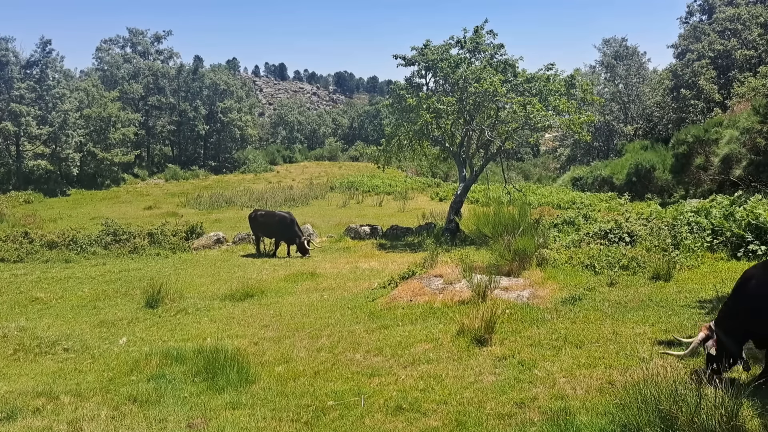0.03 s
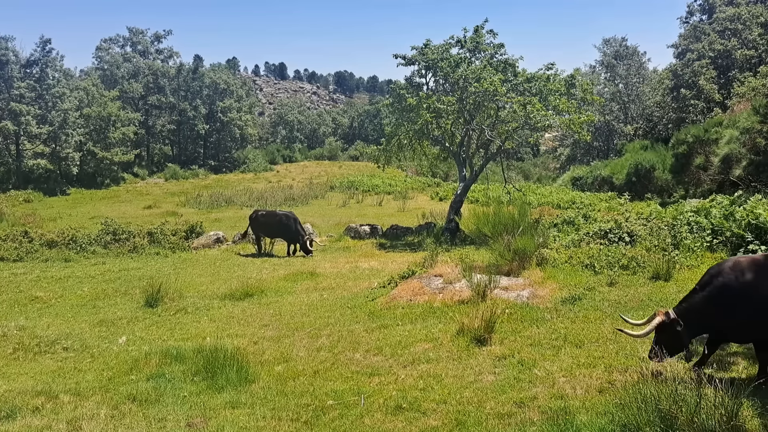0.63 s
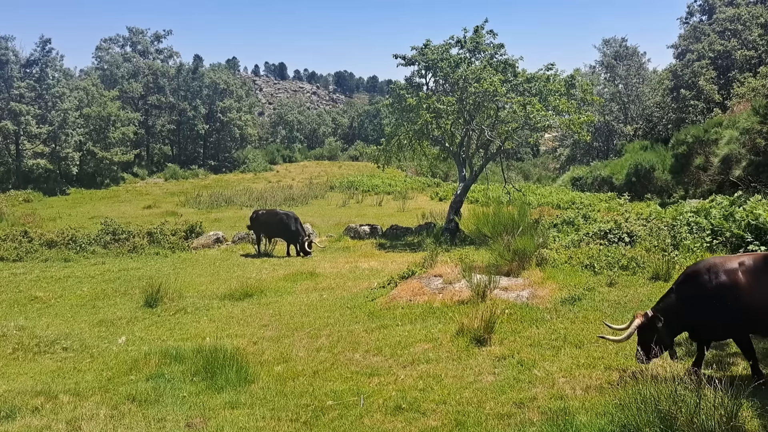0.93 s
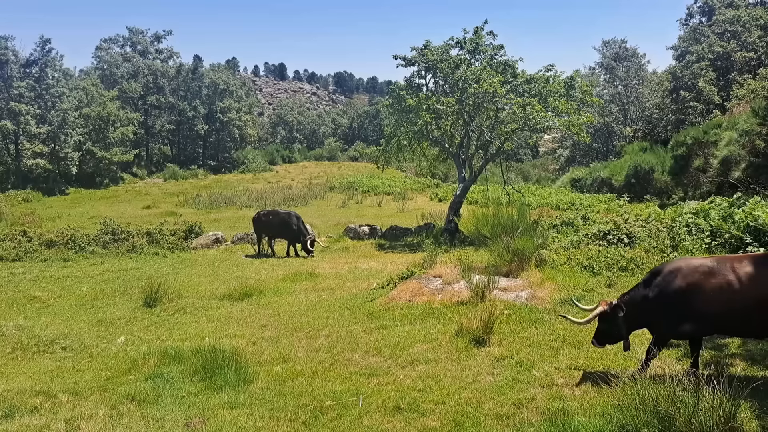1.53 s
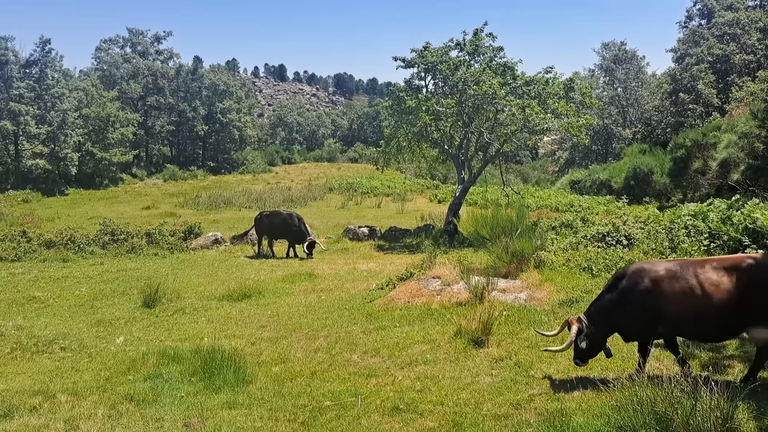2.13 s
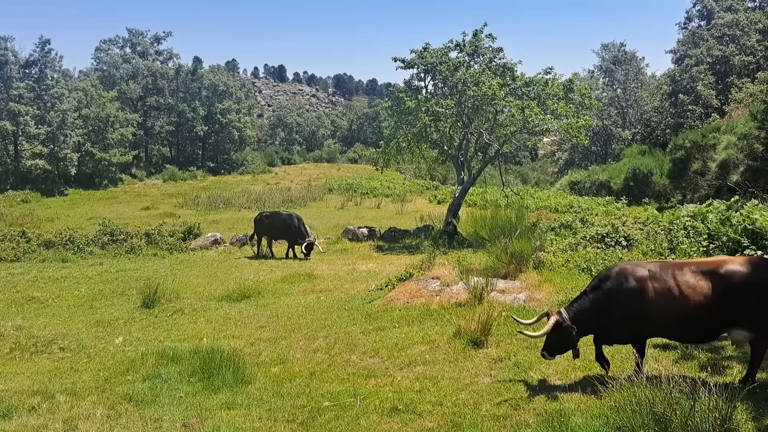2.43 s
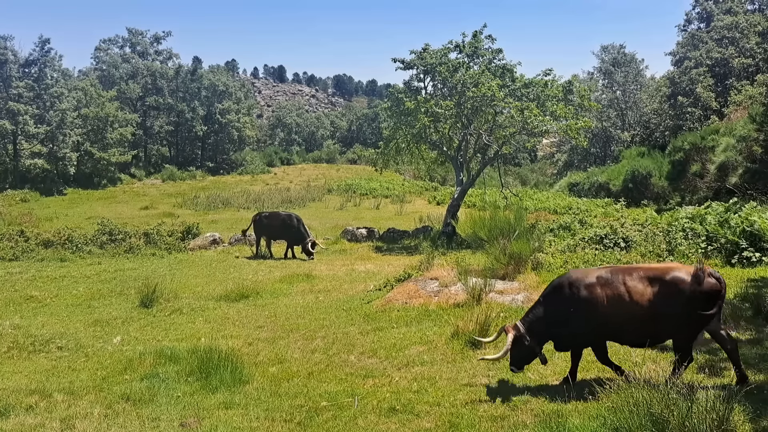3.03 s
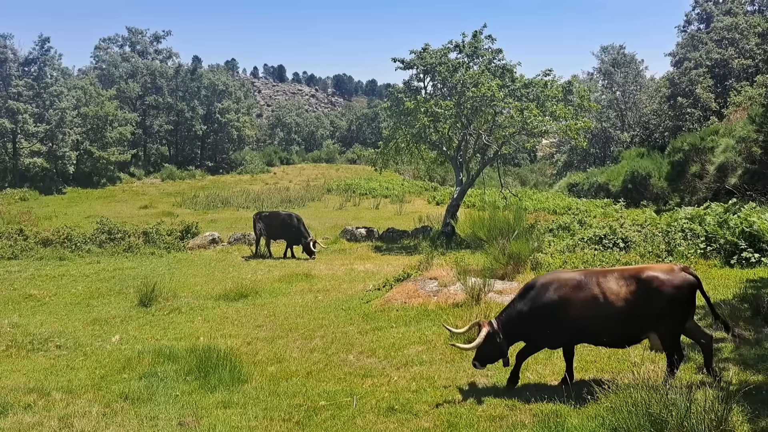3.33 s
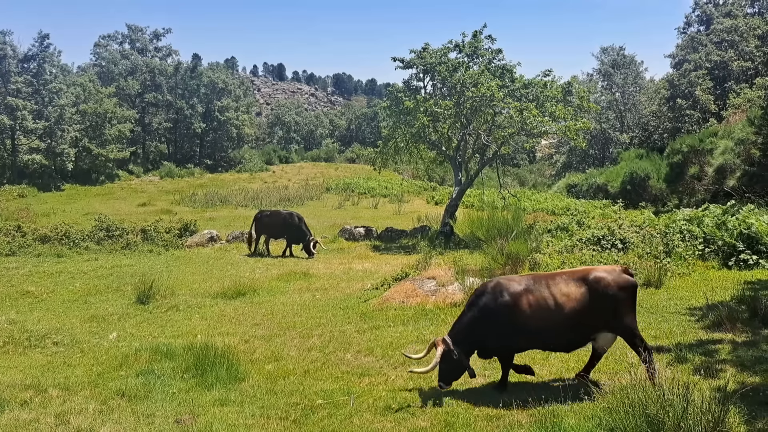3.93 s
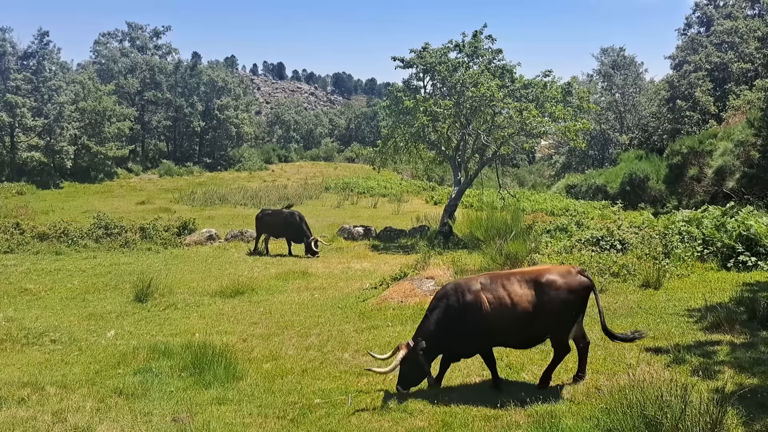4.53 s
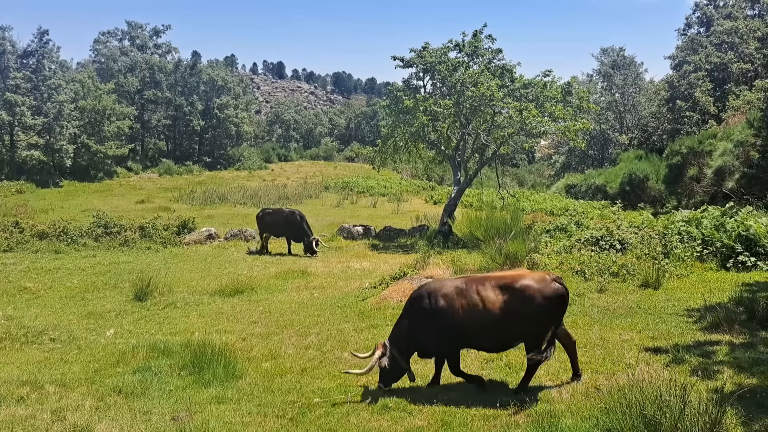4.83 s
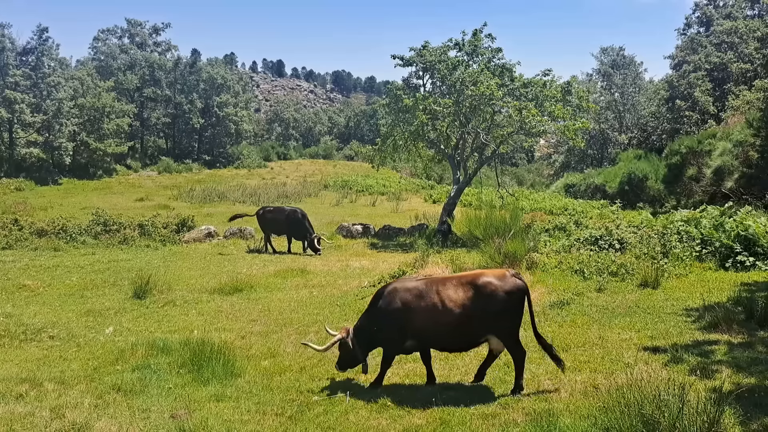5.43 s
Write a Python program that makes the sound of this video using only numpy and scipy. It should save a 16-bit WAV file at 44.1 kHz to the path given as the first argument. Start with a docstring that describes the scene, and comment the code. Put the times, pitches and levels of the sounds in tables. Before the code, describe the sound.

Bright, tinny clanks from a nearby cowbell come in irregular bursts, slightly right of the microphone, thinning out midway and growing busier near the end. A second, lower cowbell tonks now and then from further away. Each stroke rings briefly with a slight outdoor echo. The pasture is otherwise quiet, with a faint hiss, soft brushing of grass, a few hoof thuds and snapping twigs, and later some very faint high chirps.

```python
"""A riveted sheet-metal cowbell clanks brightly close by, to the right; a deeper one tonks further off.
Two cows graze in a quiet mountain pasture. Each clapper blow excites the damped modes of a bell's wall,
which ring until the clapper lands again. Hooves and muzzles stir the grass and twigs snap in bursts of
noise, small birds chirp over a faint hiss, and rocks and trees scatter a thin echo."""
import sys
import numpy as np
from scipy import signal
from scipy.fft import rfft, irfft, next_fast_len
from scipy.io import wavfile
from scipy.ndimage import uniform_filter1d

SR = 44100
rng = np.random.default_rng(int(sys.argv[2]) if len(sys.argv) > 2 else 0)


def pcm_store(signal):
    """Save signal as 16-bit PCM."""
    levels = np.round(np.clip(np.atleast_2d(signal), -1, 1) * 32767)
    wavfile.write(sys.argv[1], SR, levels.astype(np.int16).T)


N = 250929


def amp(db):
    """The decibel scale: 20 dB is a factor of ten in amplitude."""
    return 10 ** (np.asarray(db) / 20)


def unit(x):
    """Normalisation to an rms of 1."""
    return x / np.sqrt(np.mean(x ** 2) + 1e-20)


def read(points, hz):
    """Interpolation on a log-frequency axis."""
    f, value = np.transpose(points)
    return np.interp(np.log(hz + 1), np.log(f + 1), value)


def add(mix, s, sound):
    """Superposition: a sound joins the mix at time s."""
    part = mix[:, max(round(s * SR), 0):][:, :sound.shape[-1]]
    part += sound[..., :part.shape[1]]


def wander(size, span):
    """Low-pass fluctuation: noise averaged over span samples, with rms 1."""
    return unit(uniform_filter1d(rng.standard_normal(size), span))


def noise(colour_db, correlation, size):
    """Partial coherence: stereo noise of rms 1, its spectrum and correlation functions of frequency."""
    hz = np.fft.rfftfreq(size, 1 / SR)
    left, independent = rfft(rng.standard_normal((2, size)))
    shared = np.clip(correlation(hz), -1, 1)
    right = shared * left + np.sqrt(1 - shared ** 2) * independent
    return unit(irfft(np.array([left, right]) * amp(colour_db(hz)), size))


# Spectrum of the background hiss: (frequency [Hz], relative level [dB])
BACKGROUND_SPECTRUM = [(20, -33), (35, -3), (50, 7.5), (80, -4.5), (160, -5), (260, -2), (480, -10),
                       (1000, -6.5), (1600, -17.5), (3300, -18), (4500, -13.5), (6300, -13.5),
                       (9000, -21.5), (16000, -19)]
# Its slow rise and fall: (time [s], relative level [dB])
BACKGROUND_SWELL = [(0.0, -90), (0.86, -93.5), (1.08, -88), (1.35, -90), (1.52, -89.5), (1.74, -92.5),
                    (1.92, -88), (2.8, -92.5), (3.26, -86), (3.53, -90), (3.88, -91.5), (4.15, -87),
                    (4.74, -89.5), (4.94, -88), (5.59, -90.5), (5.69, -85.5)]
# Its coherence: (frequency [Hz], left-right correlation [1])
BACKGROUND_COHERENCE = [(40, 0.61), (250, 0.81), (1000, 0.32), (4000, 0.034), (15000, 0.071)]

def background(level_db=-67.5):
    """Amplitude modulation: the faint background hiss slowly rises and falls."""
    s, db = np.transpose(BACKGROUND_SWELL)
    swell = amp(np.interp(np.arange(N) / SR, s, db - np.median(db)))
    hiss = noise(lambda hz: read(BACKGROUND_SPECTRUM, hz), lambda hz: read(BACKGROUND_COHERENCE, hz),
                 size=next_fast_len(N))[:, :N]
    return amp(level_db) * hiss * swell * amp([[-1.4], [.6]])


# Decay of the echo: (frequency [Hz], reverberation time T60 [s])
ECHO_DECAY = [(300, 0.53), (800, 0.43), (2500, 0.18), (6000, 0.26), (15000, 0.08)]

def pasture_echo(sound, build_s=0.015, reflections_per_s=2500):
    """Scattering: ground, rocks and trees return sparse reflections that build up and die away."""
    taps = rng.standard_normal((2, SR)) * (rng.random((2, SR)) < reflections_per_s / SR)
    hz, t, spectrum = signal.stft(taps, SR, nperseg=256)
    decay = amp(-60 * t / read(ECHO_DECAY, hz)[:, None])
    tail = signal.istft(spectrum * decay * (1 - np.exp(-t / build_s)), SR, nperseg=256)[1]
    return signal.fftconvolve(sound, unit(tail) / np.sqrt(tail.shape[1]), axes=1)[:, :N]


# Bird calls: (time [s], duration [s], start frequency [Hz], end frequency [Hz], level [dB])
BIRD_CALLS = [(3.397, 0.078, 5180, 6280, -75.5), (3.557, 0.046, 5500, 6000, -88),
              (3.743, 0.019, 5240, 6020, -74), (3.8, 0.042, 5500, 6200, -73.5),
              (3.908, 0.045, 6950, 6900, -97), (5.135, 0.079, 6500, 6650, -77.5)]

def birds(warble_hz=280):
    """Frequency modulation: thin tones, most of them rising, waver in pitch."""
    out = np.zeros((2, N))
    for s, length, start_hz, end_hz, db in BIRD_CALLS:
        warble = wander(SR // 4, 60)[:int(length * SR)]
        hz = np.linspace(start_hz, end_hz, len(warble)) + warble_hz * warble
        tone = np.sin(2 * np.pi * np.cumsum(hz) / SR)
        add(out, s, amp(db) * unit(tone * np.hanning(len(hz))))
    return out


def puff(length, centre_hz, octaves, db, grain_db=3):
    """A noise transient: a grainy band of noise swells quickly and fades."""
    band_db = lambda hz: -40 * np.log10(1 + (np.log2((hz + 1) / centre_hz) / octaves) ** 2)
    hiss = noise(band_db, lambda hz: .7, size=16384)
    grain = amp(grain_db * wander(hiss.shape[1], 150))
    progress = np.linspace(0, 1, min(int(length * SR), len(grain)))
    envelope = np.sin(np.pi * progress ** 0.5)
    return amp(db) * unit((hiss * grain)[:, :len(progress)] * envelope)


# Hooves set down on turf: (time [s], level [dB])
HOOF_FALLS = [(1.68, -71), (1.945, -66.5), (2.084, -60.5), (4.032, -60.5)]
# Legs and muzzles brush the grass: (time [s], duration [s], centre frequency [Hz], level [dB])
GRASS_BRUSHES = [(.002, 0.13, 5000, -77.5), (.304, 0.067, 760, -69), (.998, 0.36, 533, -67),
                 (1.05, .11, 6400, -78), (1.705, 0.077, 215, -66.5), (2.752, 0.28, 233, -74.5),
                 (3.172, 0.31, 221, -69), (3.691, 0.026, 252, -66), (4.599, 0.2, 200, -65.5),
                 (5.456, .25, 275, -71)]
# Dry stalks and twigs break: (time [s], duration [s], centre frequency [Hz], level [dB])
TWIG_SNAPS = [(1.336, 0.043, 2300, -57.5), (1.701, 0.18, 2300, -75.5), (1.9845, 0.0043, 6650, -47),
              (2.024, 0.015, 6550, -75.5), (4.002, 0.026, 4050, -71)]

def grazing(side_db=-2):
    """Impact, friction and fracture: hooves thud, grass rustles and twigs snap as bands of noise."""
    out = np.zeros((2, N))
    for s, db in HOOF_FALLS:
        add(out, s, puff(length=0.078, centre_hz=38, octaves=2.38, db=db))
    for rows, octaves in (GRASS_BRUSHES, 0.78), (TWIG_SNAPS, 0.43):
        for s, length, centre_hz, db in rows:
            add(out, s, puff(length, centre_hz, octaves, db))
    return out * amp([[side_db / 2], [-side_db / 2]])


def free_times(blows):
    """Free vibration lasts from one blow to the next: these intervals in seconds."""
    return np.diff([row[0] for row in blows], append=N / SR + 1)


def ring(hz, db, t60, side_db, lead, free_s, rise_s, catch_s, flutter_db=1.58):
    """Damped vibration: modes decay exponentially, and faster once the clapper lands again."""
    t = np.arange(int(min(free_s + 5 * np.max(catch_s), .7) * SR)) / SR
    reference_s = .014  # the free decay passes through unit gain here
    caught = np.maximum(t - free_s, 0) / np.reshape(catch_s, (-1, 1))
    modes = np.exp(np.outer(2j * np.pi * hz - np.log(1000) / t60, t - reference_s) - caught)
    stereo = np.array([amp(side_db / 2) * np.exp(1j * lead), amp(-side_db / 2)])
    start_phase = np.exp(2j * np.pi * rng.random(len(hz)))
    stereo *= 2 / np.linalg.norm(stereo, axis=0) * amp(db) * start_phase
    flutter = amp(flutter_db * wander(SR, 400)[:len(t)])  # a quick, slight flutter in loudness
    return (stereo @ modes).real * flutter * (1 - np.exp(-t / rise_s))


def contact(clang_db, bright_db, shimmer_db, modes, rise_s=0.00037, side_db=-5):
    """Forced vibration: the clapper cracks on the wall, then its short rasp keeps shaking the modes."""
    crack_db, crack_s, rasp_db, rasp_s = -2, 0.004, -9, .032
    half_width_hz, valley = 65, .05
    colour = [(300, clang_db - 19), (1700, clang_db - 30.5), (3000, clang_db - 11),
              (4000, clang_db - 11), (5300, clang_db - 6.5), (7500, bright_db - 6.5),
              (9000, shimmer_db - 41), (12000, shimmer_db - 9.5), (15000, shimmer_db - 19.5)]
    peak = lambda offset_hz: rng.exponential() / (1 + (offset_hz / half_width_hz) ** 2) ** 2
    wall_db = lambda hz: 10 * np.log10(valley + sum(peak(hz - mode[0]) for mode in modes))
    crack = noise(lambda hz: read(colour, hz), lambda hz: .2, size=8192)
    rasp = noise(lambda hz: read(colour, hz) + wall_db(hz), lambda hz: .2, size=8192)
    t = np.arange(crack.shape[1]) / SR
    grit = amp(crack_db) * crack * np.exp(-t / crack_s) + amp(rasp_db) * rasp * np.exp(-t / rasp_s)
    strength = np.linalg.norm(amp([clang_db, bright_db, shimmer_db]))
    return strength * grit * (1 - np.exp(-t / rise_s)) * amp([[side_db / 2], [-side_db / 2]])


# Clapper blows on the deep bell: (time [s], force [dB], hardness as a cutoff frequency [Hz])
DEEP_BELL_BLOWS = [(.945, -60, 3500), (1.203, -32, 4970), (1.256, -51, 8000), (1.8, -47.5, 2640),
                   (2.032, -45, 2250), (2.335, -64.5, 1610), (3.234, -37, 2470), (3.487, -69.5, 2010),
                   (3.79, -51, 750), (3.845, -61, 833), (4.061, -49.5, 2500), (4.228, -36, 905),
                   (4.293, -54.5, 1610), (4.363, -51.5, 950), (4.412, -89, 3000), (5.005, -53.5, 1210),
                   (5.144, -52.5, 850), (5.185, -51.5, 850), (5.255, -84, 2500), (5.628, -58, 3000)]
# Its modes: (frequency [Hz], level within the family [dB], T60 [s], left minus right [dB])
DEEP_BELL_MODES = [(745, 0, .3, -1), (1843, 0, .7, 2), (3407, -6, .27, -9), (3445, -9, .25, -8),
                   (4334, -1, .18, -6), (4984, -7, .22, -7), (5184, -6, .16, -6), (5501, -2, .26, -4),
                   (7607, -8, .15, -3)]
# Response of its families to a fully hard blow: (hum [dB], second mode [dB], overtones [dB])
DEEP_RESPONSE = (-1, -21, -10.5)

def deep_bell(lag_s=.00009, crack_db=(-6, -6, -4), soft_slope=6.8):
    """A soft impact is a low-pass filter: the larger bell mostly hums, and cracks only on hard blows."""
    out = np.zeros((2, N))
    hz, mode_db, t60, side_db = np.transpose(DEEP_BELL_MODES)
    family = np.minimum(np.arange(len(hz)), 2)
    lead = -2 * np.pi * hz * lag_s  # the sound reaches the left side later
    catch_s = 0.0033 * (hz / hz[0]) ** 3.2  # the landing clapper stops the hum first
    for (s, force_db, hardness_hz), free_s in zip(DEEP_BELL_BLOWS, free_times(DEEP_BELL_BLOWS)):
        dull_db = 10 * np.log10(1 + (hz / hardness_hz) ** soft_slope)
        drive_db = force_db + np.array(DEEP_RESPONSE)[family] - (dull_db - dull_db[0])
        add(out, s, ring(hz, mode_db + drive_db, t60, side_db, lead, free_s, rise_s=0.01, catch_s=catch_s))
        contact_db = np.median(drive_db[family == 2]) + np.array(crack_db)
        add(out, s, contact(*contact_db, DEEP_BELL_MODES))
    return out


# Weak modes of the near bell's seams: (lowest frequency [Hz], highest frequency [Hz],
#   relative level [dB], base T60 [s], left minus right [dB])
SEAM_BAND = (4319, 14168, -30, 0.34, 1)

def seam_modes(count):
    """Irregular modal spacing: folded seams add resonances spread unevenly over the treble."""
    low_hz, high_hz, *shared = SEAM_BAND
    position = (np.arange(count) + rng.random(count)) / count
    return [(hz, *shared) for hz in low_hz + (high_hz - low_hz) * position]


# Waves round the rim: (low pair [count], high pair [count])
RIM_ORDERS = (3, 4)

def pair_shares(rim_degrees, node_leak_db=-29):
    """Mode doublets: a blow on one mode's node drives its twin most; gives the four levels in dB."""
    angle = np.radians(rim_degrees) * np.array(RIM_ORDERS)
    swing = np.column_stack([np.cos(angle), np.sin(angle)]).ravel()
    return 10 * np.log10(swing ** 2 + amp(node_leak_db) ** 2)


# Clapper blows on the near bell: (time [s], force [dB], height [about -1 shoulder to 1 lip],
#   softness [about -1 sharp to 1 soft], place round the rim [degrees], hum frequency [Hz])
NEAR_BELL_BLOWS = [(.242, -58, -1, -0.35, 56, 1047), (.299, -64.5, -0.28, -0.45, 53, 970),
                   (.434, -55, -0.6, -0.98, 3.3, 1060), (.485, -61.5, -0.22, -1.1, 51, 957),
                   (0.512, -67, -0.31, -0.79, 5.4, 1023), (0.632, -80.5, -1.1, -0.8, 48, 1040),
                   (.822, -44.5, -0.24, -0.22, 1, 1008), (.841, -50.5, -0.52, -0.12, 123, 995),
                   (.869, -54.5, -0.011, 1.45, 81, 1033), (.888, -45, -0.16, -0.015, 35, 1028),
                   (.911, -47.5, -0.052, -0.59, 23, 970), (.95, -55.5, -0.19, 1.33, 87, 1020),
                   (.97, -54, -.5, -0.65, 39, 968), (1.001, -61, -2.15, -0.31, 27, 1034),
                   (1.158, -53, -1.3, -0.17, 43, 1029), (1.405, -60, 0.3, -2.6, 66, 1080),
                   (1.441, -59, -1.04, -1.9, 4.8, 1125), (1.617, -68, -0.65, 0.19, 3.5, 1024),
                   (1.676, -76, 0.097, -0.055, 57, 980), (1.785, -76, -0.48, 0.035, 48, 1020),
                   (1.832, -52, -0.3, -0.17, 1, 1042), (1.905, -52, 0.072, -0.44, 6.9, 1043),
                   (2.07, -55, -0.33, 0.031, 70, 1030), (2.246, -53.5, -0.22, -0.12, 1, 1034),
                   (2.264, -54, 0.33, 0.45, 1.2, 1056), (2.467, -60, -0.22, 1.1, 50, 1040),
                   (2.515, -67, 0.3, 0.44, 5.1, 1067), (2.799, -56.5, 0.27, 0.41, 1.9, 1031),
                   (2.84, -60.5, -0.11, 0.037, 33.5, 1069), (3.102, -56, 0.23, 0.0068, 3.1, 1030),
                   (3.238, -54, -0.12, -0.15, 51, 1023), (3.281, -57.5, -0.42, 0.26, 66, 1040),
                   (3.299, -59.5, -0.41, -1.5, 52, 1046), (3.605, -71.5, -0.14, -.7, 76, 1007),
                   (3.633, -78.5, .3, 0.94, 56, 1014), (4.072, -55.5, 0.043, -0.23, 61, 1023),
                   (4.164, -58, 0.34, 0.21, 57, 1035), (4.254, -45.5, 0.69, -.7, 64, 1065),
                   (4.268, -46, 0.33, 0.31, 59, 1003), (4.301, -55.5, 0.76, 0.023, 1.6, 990),
                   (4.439, -50, 0.13, -0.81, 57, 1038), (4.485, -54, 0.13, -0.28, 56.5, 992),
                   (4.624, -43, 0.24, -0.16, 56, 1037), (4.657, -50.5, 0.72, -0.61, 17.4, 1028),
                   (4.738, -55, 0.32, 0.46, 50, 1020), (4.776, -66, -1.05, -0.42, 11, 1074),
                   (4.937, -64.5, 0.18, 0.051, 62, 1024), (4.982, -65, 0.38, 0.14, 59, 1080),
                   (5.017, -60, 0.63, -0.4, 58.3, 1010), (5.186, -48.5, 0.49, -0.32, 0.9, 1000),
                   (5.236, -59.5, 0.88, -.2, 58, 963), (5.262, -56, 0.062, -0.31, 49, 1060),
                   (5.283, -67, -0.92, -0.026, 3, 1020), (5.325, -65, -0.5, -0.093, 4, 1036),
                   (5.351, -64.5, 0.46, -0.33, 62, 1017), (5.498, -51, 0.12, -0.88, 64, 978),
                   (5.603, -75, 1.2, 0.27, 64, 996), (5.664, -72.5, 0.66, -0.73, 46, 1000)]
# Its modes: (frequency [Hz], relative level [dB], base T60 [s], left minus right [dB]);
#   each blow sets the hum's frequency and the levels of the four paired modes itself
NEAR_BELL_MODES = [(1033, -8, 0.13, -1), (2461, -12, 0.58, 0), (2664, -16, 0.35, -4), (4638, -2, 0.27, -11),
                   (4838, -2, 0.32, -11), (5195, -13, 0.15, -9), (5232, -10.5, 0.2, -10),
                   (6041, -17, 0.25, -11), (6315, -16, 0.18, -6), (6965, -21, 0.2, -7),
                   (7202, -19.5, 0.18, -3), (7789, -19, 0.25, -5), (7930, -14.5, 0.34, -5),
                   (8125, -21.5, 0.22, -2), (8731, -24, 0.18, -1), (9060, -27, 0.22, 1),
                   (9533, -23, 0.18, 4), (9657, -21, 0.22, 4), (9861, -18, 0.25, 5), (10949, -22, 0.2, 0),
                   (11297, -14.5, 0.22, 0), (11410, -26, 0.15, -2), (11672, -6, 0.2, -5),
                   (11983, -23, 0.12, -4), (12736, -25, 0.18, -5), (13305, -18.5, 0.17, -4),
                   (13678, -23, 0.2, -4), (13894, -25, 0.18, -1), (15365, -23, 0.16, -7)]
# Borders between the hum, low pair, high pair, clang, bright and shimmer families: (frequency [Hz])
FAMILY_BORDERS = [1500, 3500, 5000, 6600, 9300]
# Sustain of each family: (factor on T60 [1])
FAMILY_SUSTAIN = (1.02, 1.38, 1.074, 0.5, 0.64, 0.84)
# Response of each family: (level over the force [dB], height slope [dB/step],
#   softness slope [dB/step], slope with force above the usual [dB/dB])
FAMILY_RESPONSE = [(2.5, -1.2, 7.5, -0.01), (-5, 7, 1, -0.07), (5.5, 11, 2, 0.1045),
                   (-1.5, -4.5, -1.3, 0.05), (-1.5, 0.3, -0.7, -0.0754), (2.5, 0.5, -2, 0.1)]
# Phase between the two sides: (frequency [Hz], lead of the left [rad])
NEAR_PHASE_LEAD = [(1030, 1.97), (2450, 1.12), (4600, -2.5), (6300, -2), (7900, -1.43), (9800, 2.14),
                   (11300, 0.8), (11700, -1.6)]

def near_bell(usual_force_db=-56.5, force_scatter_db=7, lip_sustain=1.19):
    """Modal superposition: a flattened bell has paired modes, and each blow drives them differently."""
    contact_db, drag_db, rebound_db = -2.5, 4, 3.5
    out = np.zeros((2, N))
    mode_hz, mode_db, base_t60, side_db = np.transpose(list(NEAR_BELL_MODES) + seam_modes(count=32))
    family = np.searchsorted(FAMILY_BORDERS, mode_hz)
    family_t60 = base_t60 * np.array(FAMILY_SUSTAIN)[family]
    for blow, free_s in zip(NEAR_BELL_BLOWS, free_times(NEAR_BELL_BLOWS)):
        s, force_db, height, softness, rim_degrees, hum_hz = blow
        family_db = force_db + np.array(FAMILY_RESPONSE) @ [1, height, softness, force_db - usual_force_db]
        unevenness, tilt, turn = rng.standard_normal((3, len(mode_hz)))
        db = mode_db + force_scatter_db * unevenness
        db[1:5] = pair_shares(rim_degrees)
        family_power = np.bincount(family, amp(db) ** 2)
        db += (family_db - 10 * np.log10(family_power))[family]  # each family sums to its level
        hz = np.where(family == 0, hum_hz, mode_hz)
        t60 = family_t60 * lip_sustain ** height  # blows on the shoulder die sooner
        beam = hz / mode_hz.max()  # high modes radiate narrow beams, which turn as the bell swings
        side = side_db + 3 * beam * tilt
        lead = read(NEAR_PHASE_LEAD, hz) + beam * turn
        add(out, s, ring(hz, db, t60, side, lead, free_s, rise_s=0.0025, catch_s=0.0099))
        drag = np.exp(-free_s / 0.1)  # between quick blows the clapper scrapes along the wall
        touch = contact(*family_db[-3:], NEAR_BELL_MODES)
        add(out, s, amp(contact_db + drag_db * drag) * touch)
        rebound_s = rng.uniform(.005, .018)  # a free clapper grazes the wall once more
        add(out, s + rebound_s, amp(contact_db + rebound_db) * (1 - drag) * touch)
    return out


def scene(near_wet_db=-22, deep_wet_db=-20, bird_wet_db=-6):
    """Direct and scattered sound add: bells and birds with their echo, over grazing and faint hiss."""
    near, deep, calls = near_bell(), deep_bell(), birds()
    echo = pasture_echo(amp(near_wet_db) * near + amp(deep_wet_db) * deep + amp(bird_wet_db) * calls)
    return near + deep + calls + echo + grazing() + background()


def record(dry, low_cut_hz=38, high_cut_hz=16000):
    """Band limiting: the deepest bass rolls off and the highest treble is cut steeply."""
    high_pass = signal.butter(4, low_cut_hz, "high", fs=SR, output="sos")
    low_pass = signal.firwin(511, high_cut_hz, window=("kaiser", 9), fs=SR)
    return signal.oaconvolve(signal.sosfilt(high_pass, dry), low_pass[None], "same", axes=1)


dry = scene()
out = record(dry)
pcm_store(out)
```